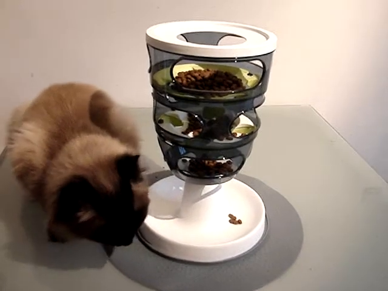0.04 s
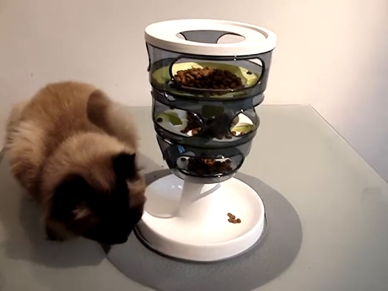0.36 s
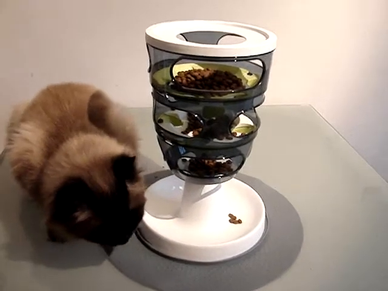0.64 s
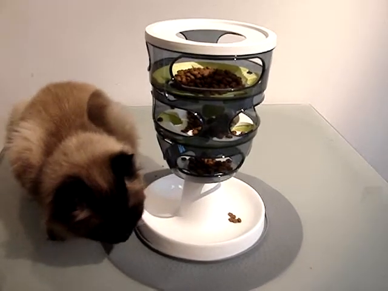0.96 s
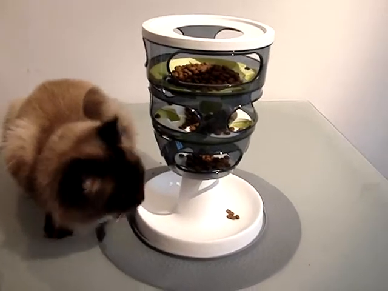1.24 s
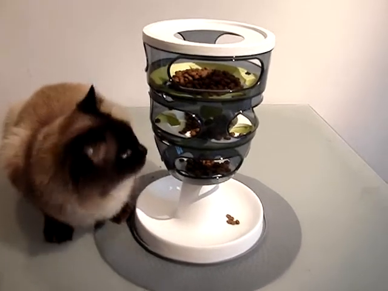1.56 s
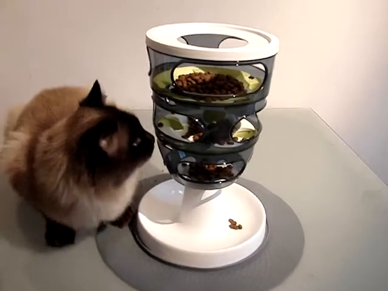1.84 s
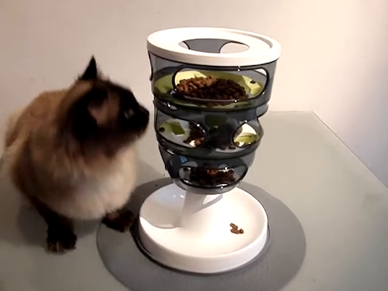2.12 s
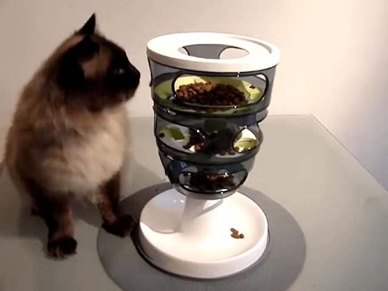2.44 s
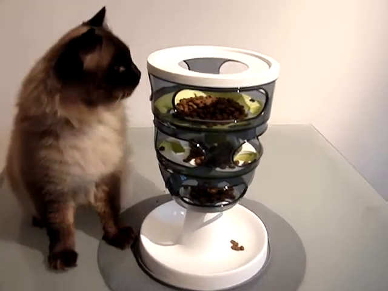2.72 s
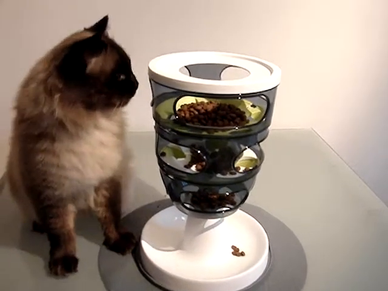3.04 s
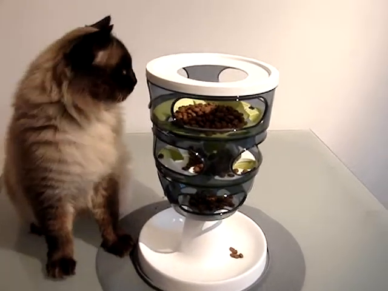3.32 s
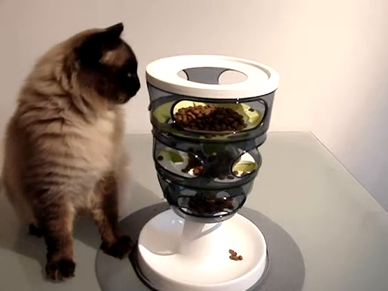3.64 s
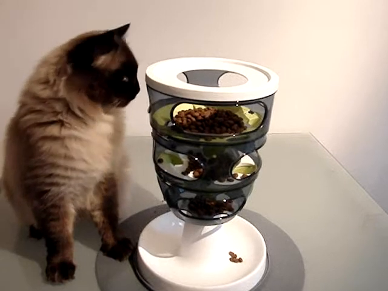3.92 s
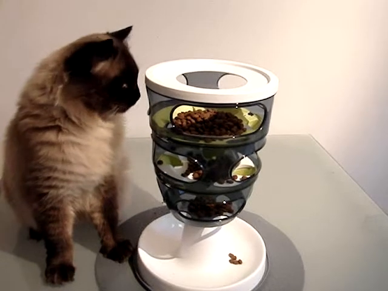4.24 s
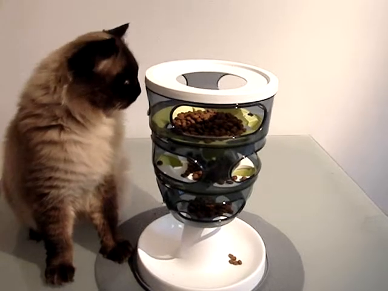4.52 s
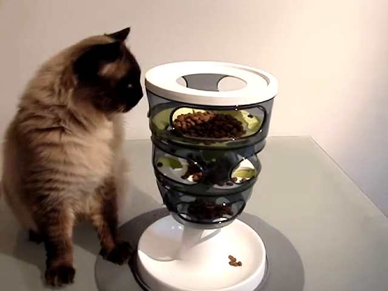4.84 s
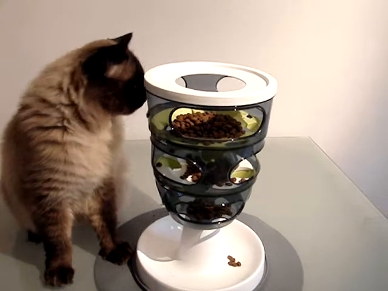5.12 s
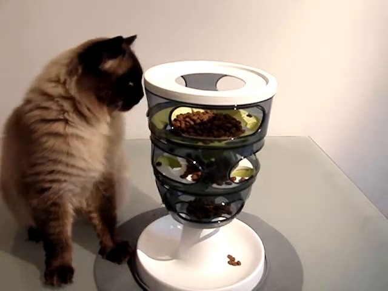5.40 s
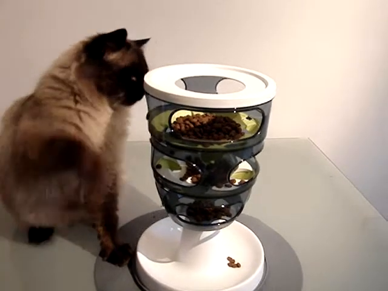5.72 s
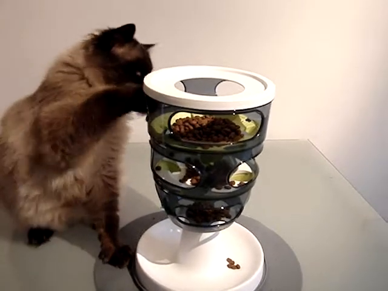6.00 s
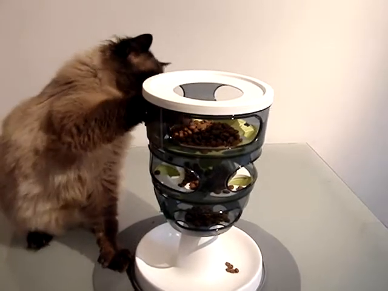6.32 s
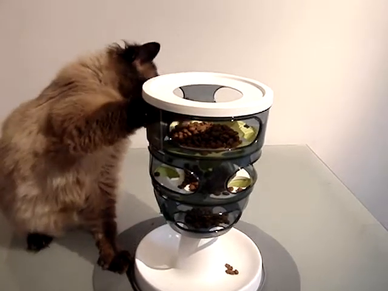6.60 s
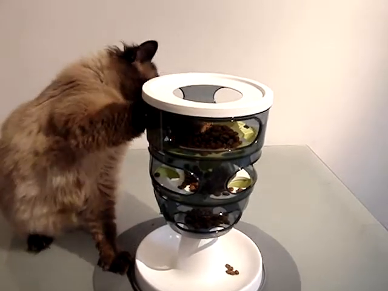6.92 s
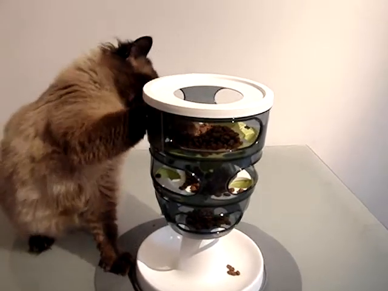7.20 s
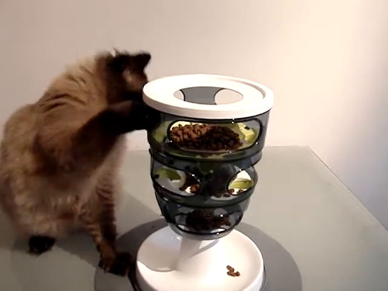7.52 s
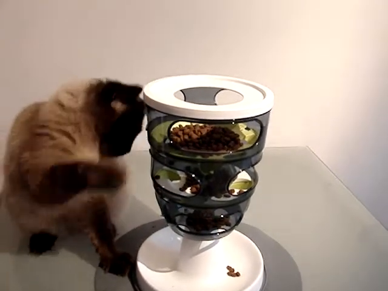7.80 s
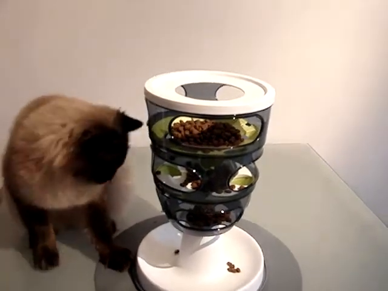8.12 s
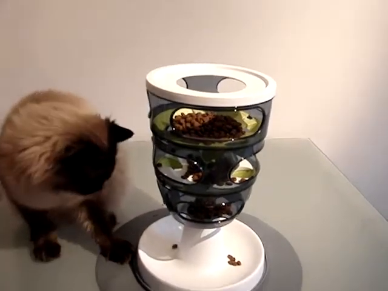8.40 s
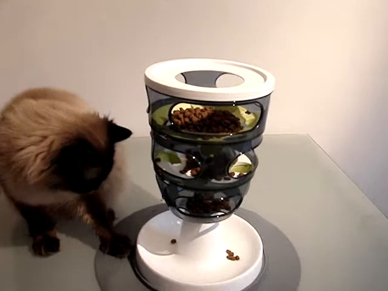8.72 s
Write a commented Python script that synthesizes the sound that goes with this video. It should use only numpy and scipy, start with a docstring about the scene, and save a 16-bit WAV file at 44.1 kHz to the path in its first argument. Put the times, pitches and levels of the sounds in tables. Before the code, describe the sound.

After a long stretch of soft ventilation, dry pet food scrapes and squeaks in a plastic tower, then drops and rolls.

```python
"""A quiet, bare room, with one microphone near a table where a cat works at a plastic tower feeder.
After faint touches and a soft bump its paw rubs the wall, then rakes dry kibble over a tray in strokes
that knock the hollow tower and rock it on the table. Dragged pellets squeak; a loose one bounces down
the tiers and rolls to rest in the dish. Farther off, ventilation murmurs with a low drone and a hum."""
import sys
import numpy as np
from scipy import signal
from scipy.io import wavfile
from scipy.ndimage import uniform_filter1d

SR = 44100
rng = np.random.default_rng(int(sys.argv[2]) if len(sys.argv) > 2 else 0)


def master_out(mix):
    """Clip the mix to full scale and print it as 16-bit PCM to the path in sys.argv[1]."""
    frames = np.transpose(np.atleast_2d(mix))
    ceiling = np.clip(frames, -1, 1)
    pcm = np.round(ceiling * 32767).astype(np.int16)
    wavfile.write(sys.argv[1], SR, pcm)


N = 385875
TIME = np.arange(N) / SR
HZ = np.fft.rfftfreq(8192, 1 / SR)

# paw strokes through the kibble: (time [s], length [s], relative level [dB], fade [dB],
# brightness [dB/octave], lower edge [Hz], relative tower knock [dB], relative table thud [dB])
STROKES = [(7.537, .015, -9, -5, 1, 900, -33, -34.5), (7.640, 0.03, -10.5, 3, -1.5, 1080, -32, -29.5),
           (7.699, 0.047, -13, 0.5, 3, 2060, -50, -31), (7.767, .03, -18, 12, -0.5, 1230, -39, -37),
           (7.824, .027, -20.5, 15, 8, 2200, -46, -70), (7.917, .063, -11.5, 17, .5, 2140, -50, -36),
           (7.977, .028, -16.5, 0, 7, 1400, -36, -34), (8.007, 0.041, -15, 21, -1.5, 1350, -43, -71)]
# ring of the thin shell: (frequency [Hz], width [Hz], lift [dB])
SHELL_MODES = [(1404, 50, 4), (1510, 40, 3), (1775, 60, 6), (2170, 70, 3), (2552, 70, 4), (2857, 70, 3),
               (3080, 120, 1.5), (3300, 60, 3), (3610, 60, 3), (3950, 120, 2), (4565, 60, 3),
               (5285, 110, 5.5), (5950, 160, 3), (7400, 250, 2)]
# ring of the dish: (frequency [Hz], width [Hz], relative lift [dB])
DISH_MODES = [(1385, 40, 5), (1600, 40, 3), (1785, 44, 9), (2075, 50, 4), (2330, 60, 3), (2770, 70, 3),
              (3440, 120, 3), (3900, 120, 2)]
# spectrum of a pellet striking plastic: (frequency [Hz], relative level [dB])
IMPACT_SPECTRUM = [(100, -43.5), (350, -12), (800, -17.5), (1100, -12.5), (1400, -6), (2200, -1), (3500, 0),
                   (4500, -6), (7500, -10.5), (10000, -24.5)]


def raking(settle_s=0.041, settle_db=-17.5, settle_fade_db=8):
    """Each stroke drives the heap over the tray; the harder it ends, the louder the pellets settle."""
    out = np.zeros(N)
    for s, length, db, fade_db, tilt_db, edge_hz, _, _ in STROKES:
        add(out, s, scrape(length, db, fade_db, tilt_db, edge_hz))
        end_db = db - fade_db / 2
        add(out, s + length, scrape(settle_s, end_db + settle_db, settle_fade_db, tilt_db + 1, edge_hz))
    return out


def scrape(length, db, fade_db, tilt_db, edge_hz, thin_db=13, bite_s=0.00064):
    """Pellets jostle each other and the tray; the shell rings with them."""
    # spectrum of raked kibble: (frequency [Hz], relative level [dB])
    kibble_spectrum = [(100, -16.5), (400, -8.5), (900, -9), (1500, -8), (2100, -5.5), (2700, 0.5),
                       (3500, -2.5), (4400, -7.5), (6000, -9.5), (8000, -11.5), (10000, -19.5)]
    thinning_db = -thin_db / (1 + (HZ / edge_hz) ** 8)  # glancing contacts carry little low end
    colour = response(read(kibble_spectrum, HZ) + lifts(SHELL_MODES) + slope(tilt_db) + thinning_db)
    crowd = contacts(length, fade_db, per_s=3000, spread_db=2)
    bite = 1 - np.exp(-np.arange(len(crowd)) / SR / bite_s)  # the push spreads through the heap
    return gain_of(db) * signal.fftconvolve(crowd * bite, colour)


def pellets(landing_db=9.5, touch_db=6, in_dish_s=8.15, rebound_s=.008, rebound_db=-4.5):
    """Loose pellets fall from tier to dish, rebounding once a landing; the cat taps the tower lightly."""
    # pellets landing: (time [s], relative level [dB], brightness [dB/octave])
    landings = [(7.5439, -5, -5.5), (7.7695, -11, -3.5), (8.106, -4.5, 0.5), (8.1336, -10, 0.5),
                (8.1538, -0.5, -1.5), (8.2943, -11, -3), (8.3341, -12.5, -3.5), (8.3512, -20, -2),
                (8.3858, -17.5, 0.5), (8.4491, -19, 1.5), (8.489, -20, 1.5), (8.523, -19, 0),
                (8.55, -21, -3)]
    # touches of nose and claw: (time [s], relative level [dB], brightness [dB/octave])
    touches = [(0.228, -32.5, -2), (1.291, -31.5, -8), (1.735, -35, 0), (6.42, -36, 0),
               (7.4215, -22.5, -3.5), (7.457, -27, -1)]
    out = np.zeros(N)
    shell_db = lifts(SHELL_MODES)
    dish_db = 1.4 * lifts(DISH_MODES) + slope(tilt_db=-1)  # the dish rings longer and duller
    for s, db, tilt_db in landings:
        ring_db = dish_db if s > in_dish_s else shell_db
        add(out, s, tap(db + landing_db, tilt_db, ring_db))
        again_s = s + rebound_s * rng.uniform(.9, 1.1)
        add(out, again_s, tap(db + landing_db + rebound_db, tilt_db, ring_db))
    for s, db, tilt_db in touches:
        add(out, s, tap(db + touch_db, tilt_db, shell_db))
    return out


def tap(db, tilt_db, ring_db, spot_db=1.6, chatter_s=0.0018):
    """One hard contact; each spot on the plastic favours other frequencies."""
    ripple = uniform_filter1d(rng.standard_normal(len(HZ)), size=50)
    spot = evened(uniform_filter1d(ripple, size=50))
    ring = response(read(IMPACT_SPECTRUM, HZ) + ring_db + slope(tilt_db) + spot_db * spot)
    t = np.arange(SR // 100) / SR
    chatter = rng.standard_normal(len(t)) * np.exp(-t / chatter_s)  # the pellet is rough
    click = signal.fftconvolve(ring, 0.18 * chatter + (t == 0))
    return gain_of(db) * click / np.linalg.norm(click)


def rolling(start_s=8.166, stop_s=8.59, fast_db=-26.5, crawl_db=-44,
            slowing_db_per_s=80, stop_db_per_s=200):
    """The lumpy pellet tumbles round the dish, softer as it slows to a crawl and stops."""
    out = np.zeros(N)
    colour = response(read(IMPACT_SPECTRUM, HZ) + 1.4 * lifts(DISH_MODES) + slope(tilt_db=-2))
    tumbles = contacts(N / SR - start_s, fade_db=0, per_s=1100, spread_db=4)
    t = np.arange(len(tumbles)) / SR
    slowing = np.hypot(gain_of(fast_db - slowing_db_per_s * t), gain_of(crawl_db))
    stop = gain_of(-stop_db_per_s * np.maximum(start_s + t - stop_s, 0))
    add(out, start_s, signal.fftconvolve(tumbles * slowing * stop, colour))
    return out


def squeaks(pitch_jitter=0.029):
    """A dragged pellet sticks and slips unevenly; the pitch falls as it slows."""
    # drags: (time [s], length [s], start pitch [Hz], end pitch [Hz], relative level [dB], overtone [dB])
    drags = [(7.645, 0.07, 2580, 2536, -31, -25), (7.7, 0.0654, 2730, 2375, -19, -6.5),
             (7.705, 0.033, 3000, 2960, -23, 5), (7.77, 0.065, 2500, 2480, -35, -16),
             (7.918, .065, 2700, 2068, -20, -26)]
    out = np.zeros(N)
    for s, length, start_hz, end_hz, db, overtone_db in drags:
        n = int(length * SR)
        jitter, grip = (evened(uniform_filter1d(v, size=60))[:n] for v in rng.standard_normal((2, SR)))
        slip_hz = np.linspace(start_hz, end_hz, n) * (1 + pitch_jitter * jitter)
        phase = 2 * np.pi * np.cumsum(slip_hz) / SR
        slips = np.sin(phase) + gain_of(overtone_db) * np.sin(2 * phase)
        envelope = (1 + .5 * grip) * signal.windows.tukey(n, .5)
        add(out, s, gain_of(db) * evened(slips * envelope))
    return out


def tower_knocks(swell_s=0.002):
    """Each stroke knocks the hollow tower; the soft paw lets the ring swell."""
    # low modes of the whole tower: (nominal frequency [Hz], relative level [dB], t60 [s])
    tower_modes = [(312, 2, 0.36), (369.5, 1, 0.14), (450, -22, .08), (555.5, 1.5, 0.19), (776, -2, 0.1),
                   (1094, -5, .08)]
    out, t = np.zeros(N), np.arange(SR // 2) / SR
    onset = 1 - np.exp(-t / swell_s)
    for s, *_, knock_db, _ in STROKES:
        ring = sum(gain_of(db - 60 * t / t60) * np.sin(2 * np.pi * hz * t * rng.uniform(0.97, 1.01))
                   for hz, db, t60 in tower_modes)
        add(out, s, gain_of(knock_db) * ring * onset)
    return out


def table_thuds(sway_hz=26, sway_t60=0.14, sway_db=-4, bump_hz=130, bump_t60=0.037):
    """The shoved tower bumps and rocks on the table: a dead, low push."""
    out, t = np.zeros(N), np.arange(SR // 2) / SR
    sway = gain_of(sway_db - 60 * t / sway_t60) * np.sin(2 * np.pi * sway_hz * t)
    bump = gain_of(-60 * t / bump_t60) * np.sin(2 * np.pi * bump_hz * t)
    for s, *_, thud_db in STROKES:
        add(out, s, gain_of(thud_db) * (sway + bump))
    return out


def rubbing():
    """Fur and paw brush the shell: fine, soft friction that eases off."""
    # rubs on the plastic: (time [s], length [s], relative level [dB])
    rubs = [(1.29, .04, -57), (1.487, 0.057, -57), (1.721, .068, -62), (7.112, .105, -39.5),
            (7.236, .145, -48.5), (7.427, .055, -53)]
    # spectrum of fur on plastic: (frequency [Hz], relative level [dB])
    fur_spectrum = [(100, -26), (400, -16), (750, -9), (1050, 1), (1600, -0.5), (2800, -5), (4500, -12),
                    (7000, -25), (10000, -33)]
    out = np.zeros(N)
    colour = response(read(fur_spectrum, HZ) + 0.66 * lifts(SHELL_MODES))
    for s, length, db in rubs:
        grains = contacts(length, fade_db=8.5, per_s=3500, spread_db=4)
        grains *= signal.windows.tukey(len(grains), .3)
        add(out, s, gain_of(db) * signal.fftconvolve(grains, colour))
    return out


def room(direct, paths=6, crossfade_s=.012):
    """Contacts move about the tower, so their sound reaches the microphone by changing paths."""
    place = TIME / crossfade_s
    out = direct.copy()
    for k in range(paths):
        away = np.minimum(abs((place - k) % paths - 1), 1)
        out += signal.fftconvolve(direct * np.cos(np.pi / 2 * away), echoes())[:N]
    return out


def echoes(tail_db=-3, early_db=-4, early_t60=0.064):
    """Quick reflections from the nearby tower and table, then the tail of the bare walls."""
    # decay of the room: (frequency [Hz], t60 [s])
    room_decay = [(200, 0.34), (1000, 0.41), (2500, 0.4), (5000, 0.41), (10000, 0.31)]
    t = np.arange(SR) / SR
    reflections = rng.choice([-1., 1.], SR) * (rng.random(SR) < .1)
    early = rng.permutation(reflections) * gain_of(-60 * t / early_t60) * (t > .001)
    hz, frame_s, bands = signal.stft(reflections * (t > .006), SR, nperseg=256)
    decay = gain_of(-60 * frame_s / read(room_decay, hz)[:, None])
    tail = signal.istft(bands * decay, SR, nperseg=256)[1][:SR]
    return (gain_of(early_db) * evened(early) + gain_of(tail_db) * evened(tail)) / np.sqrt(SR)


def ventilation():
    """Air flows steadily through resonant ducts."""
    # airflow, easing a little at first: (time [s], level [dB])
    flow = [(0, -48.5), (1.3, -49.5), (8.75, -49.5)]
    # spectrum of the moving air: (frequency [Hz], relative level [dB])
    air_spectrum = [(20, -18), (70, -10), (130, -7.5), (220, -3.5), (500, -1.5), (800, -0.5), (1050, -4.5),
                    (2000, -10.5), (4000, -15.5), (8000, -18), (10000, -23)]
    # duct resonances: (frequency [Hz], width [Hz], lift [dB])
    duct_modes = [(401.8, 18, 10.5), (696, 21.7, 11), (752, 16, 4.5), (900, 23, 7), (1358, 14, 5),
                  (7950, 110, 1)]
    flow_db = np.interp(TIME, *np.transpose(flow))
    return gain_of(flow_db) * noise(read(air_spectrum, HZ) + lifts(duct_modes))


def drone(on_db=-54.5, idle_db=-65, switch_s=0.067, paw_bump_db=-54):
    """A resonant drone idles and runs by turns; the tower gives a soft, low bump as the paw lifts."""
    # spells of running: (on [s], off [s])
    runs = [(2.72, 6.37), (7.12, 8.9)]
    # spectrum of the drone: (frequency [Hz], relative level [dB])
    drone_spectrum = [(120, -42.5), (190, -21), (230, -11.5), (330, -11.5), (390, -13.5), (480, -29),
                      (900, -45)]
    # its resonances: (frequency [Hz], width [Hz], lift [dB])
    drone_modes = [(233.6, 11, 10.4), (302.4, 10.6, 14.2), (381, 14.3, 14.4)]
    running = sum(np.clip(np.minimum(TIME - on, off - TIME) / switch_s + .5, 0, 1) for on, off in runs)
    paw_bump = gain_of(paw_bump_db) * swell(centre_s=5.78, half_width_s=.04)
    level = gain_of(idle_db + (on_db - idle_db) * running) + paw_bump  # both share one low noise
    return level * noise(read(drone_spectrum, HZ) + lifts(drone_modes))


def hum(hz=50, rest_db=-77.5):
    """A faint, deep tone swells now and then over its resting level."""
    # swells of the hum: (centre [s], level [dB])
    rises = [(.7, -68.5), (1.8, -67.5), (6.55, -65.5)]
    level = gain_of(rest_db) + sum(gain_of(db) * swell(s, half_width_s=0.24) for s, db in rises)
    return level * np.sqrt(2) * np.sin(2 * np.pi * hz * TIME)


def contacts(length, fade_db, per_s, spread_db):
    """A crowd of tiny collisions of uneven size; a negative fade makes them grow."""
    n = int(length * SR)
    chance, size, sign = np.random.default_rng(rng.integers(2 ** 31)).random((n, 3)).T
    strength = gain_of(spread_db * np.minimum(-np.log(1 - size), 3))
    clicks = (chance < per_s / SR) * np.sign(sign - .5) * strength
    return evened(clicks * gain_of(-fade_db * np.arange(n) / n))


def noise(db):
    """Steady noise with this dB spectrum."""
    return evened(signal.oaconvolve(rng.standard_normal(N + len(HZ) - 1), response(db), "valid"))


def response(db):
    """Minimum-phase impulse response of unit energy with this dB spectrum."""
    log_gain = np.maximum(db - db.max(), -100) * np.log(10) / 20
    mirrored = np.r_[log_gain, log_gain[-2:0:-1]]
    spectrum = np.exp(np.conj(signal.hilbert(mirrored)))
    impulse = np.fft.ifft(spectrum).real[:len(HZ)]
    return impulse / np.linalg.norm(impulse)


def lifts(modes):
    """The dB bumps of a set of resonances."""
    power = sum((gain_of(db) ** 2 - 1).clip(0) / (1 + (2 * (HZ - hz) / width) ** 2)
                for hz, width, db in modes)
    return 10 * np.log10(1 + power)


def slope(tilt_db, pivot_hz=3000):
    """Brightens or dulls by so many dB an octave."""
    return tilt_db * np.log2(np.maximum(HZ / pivot_hz, .25))


def read(points, hz):
    """Reads a curve on a log-frequency axis."""
    point_hz, value = np.transpose(points)
    return np.interp(np.log(hz + 1), np.log(point_hz + 1), value)


def swell(centre_s, half_width_s):
    """A smooth rise and fall around a moment."""
    return np.exp(-((TIME - centre_s) / half_width_s) ** 2)


def gain_of(db):
    """Decibels to amplitude."""
    return 10 ** (np.asarray(db) / 20)


def evened(x):
    """Scales to an rms of one."""
    return x / np.sqrt(np.mean(x ** 2) + 1e-20)


def add(mix, s, sound):
    """Mixes a sound in at a time."""
    part = mix[round(s * SR):][:len(sound)]
    part += sound[:len(part)]


def scene(feeder_db=-2):
    """At the microphone, in mono: the feeder and its echoes in front, the room tone behind."""
    feeder = raking() + squeaks() + pellets() + rolling() + rubbing() + tower_knocks()
    foreground = gain_of(feeder_db) * room(feeder) + table_thuds()
    return (foreground + ventilation() + drone() + hum())[None]


def record(dry, threshold_db=-17.5, recover_db_per_s=70, strength=0.74, cutoff_hz=10100):
    """After the microphone, a limiter ducks loud strokes at once and lets go slowly; then a low-pass."""
    power_db = 10 * np.log10(abs(uniform_filter1d(dry[0] ** 2, size=350)) + 1e-12)
    recovery_db = TIME * recover_db_per_s
    held_db = np.maximum.accumulate(power_db + recovery_db) - recovery_db
    over_db = np.maximum(held_db - threshold_db, 0)
    limited = dry / gain_of(strength * uniform_filter1d(over_db, size=100))
    lowpass = signal.firwin(601, cutoff_hz, window=("kaiser", 8), fs=SR)
    return signal.oaconvolve(limited, lowpass[None], "same")


dry = scene()
out = record(dry)
master_out(out)
```